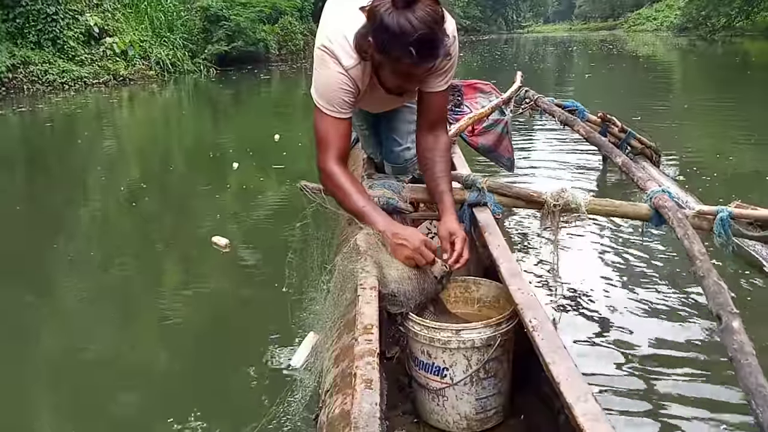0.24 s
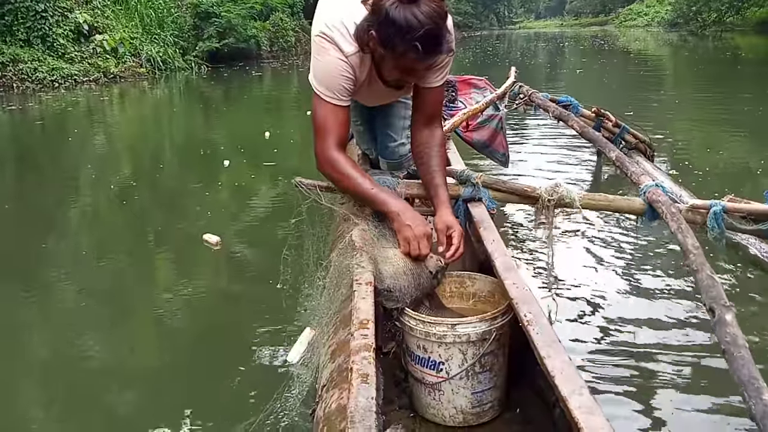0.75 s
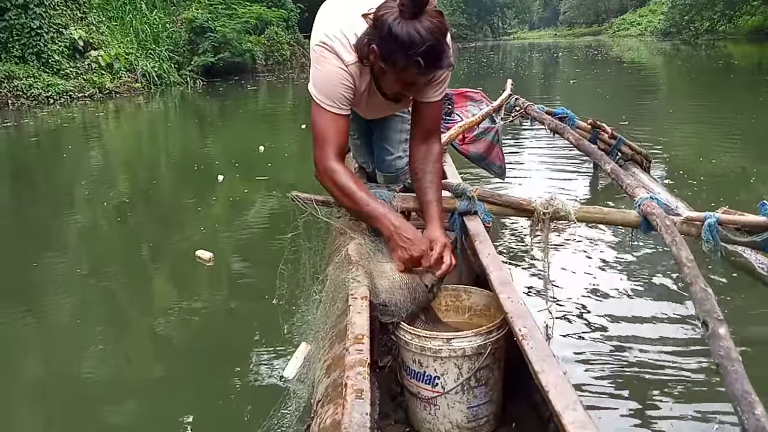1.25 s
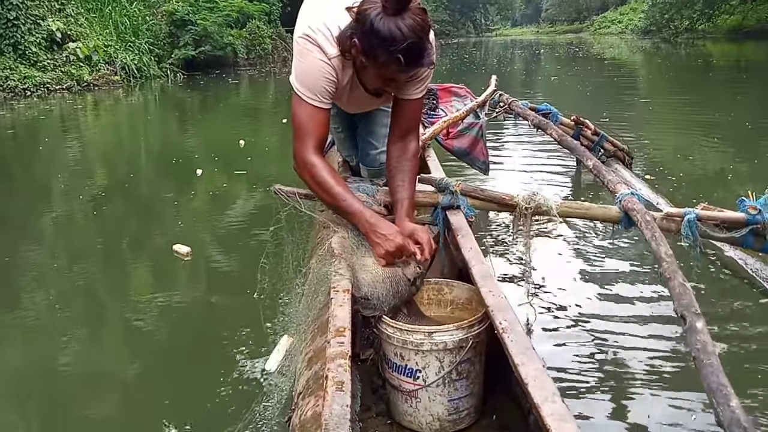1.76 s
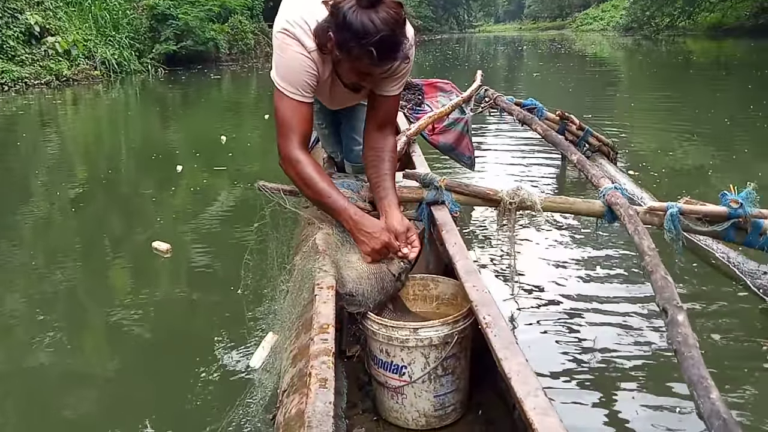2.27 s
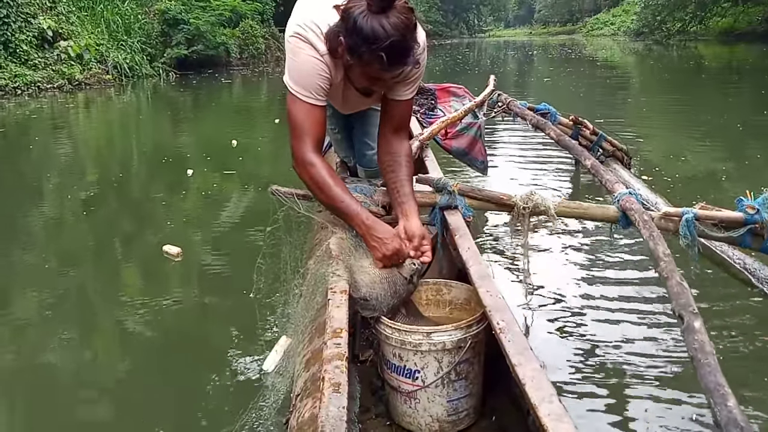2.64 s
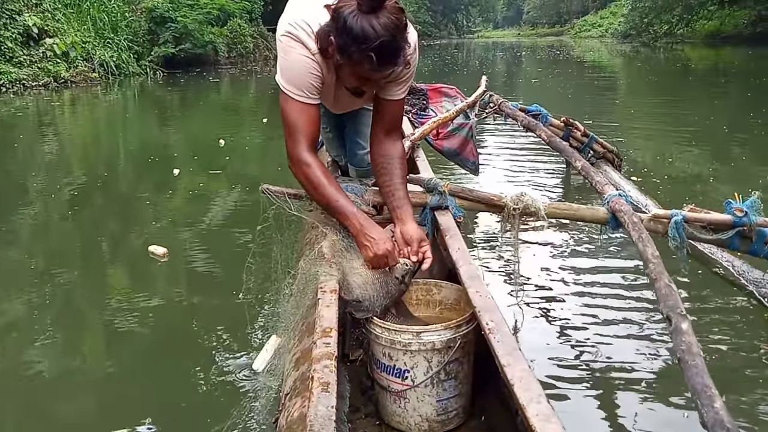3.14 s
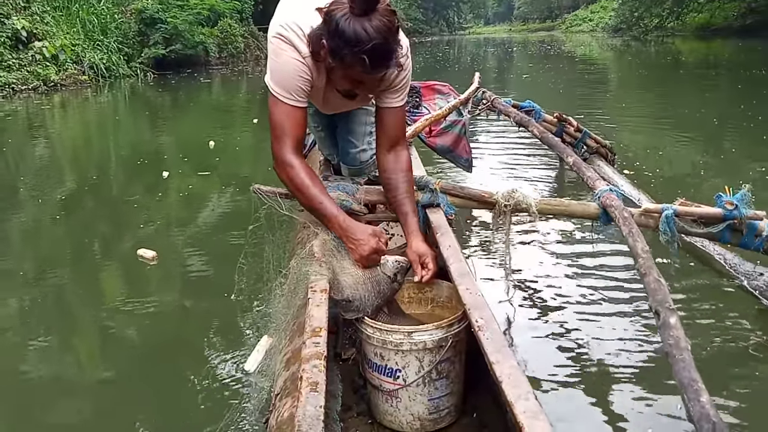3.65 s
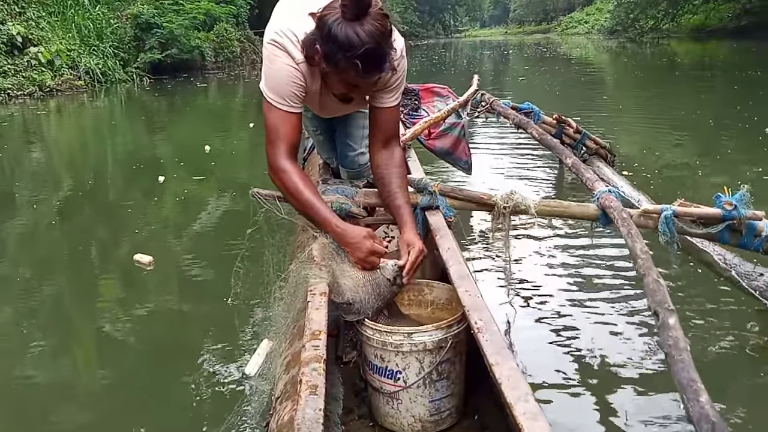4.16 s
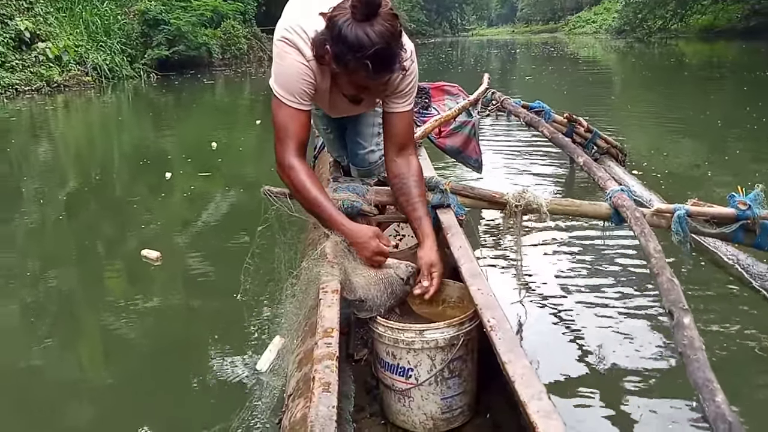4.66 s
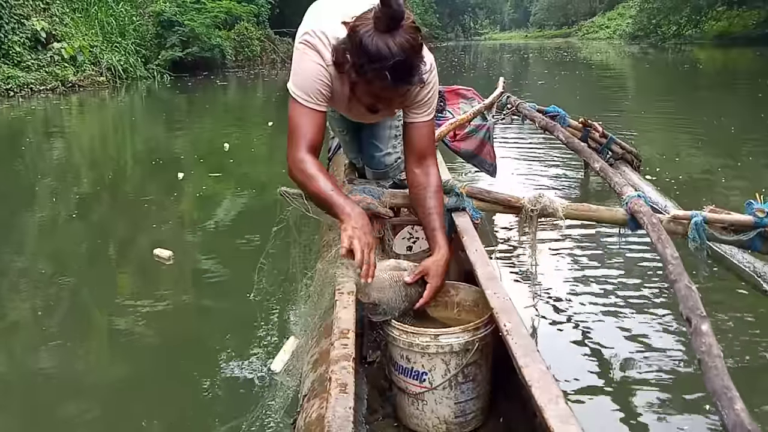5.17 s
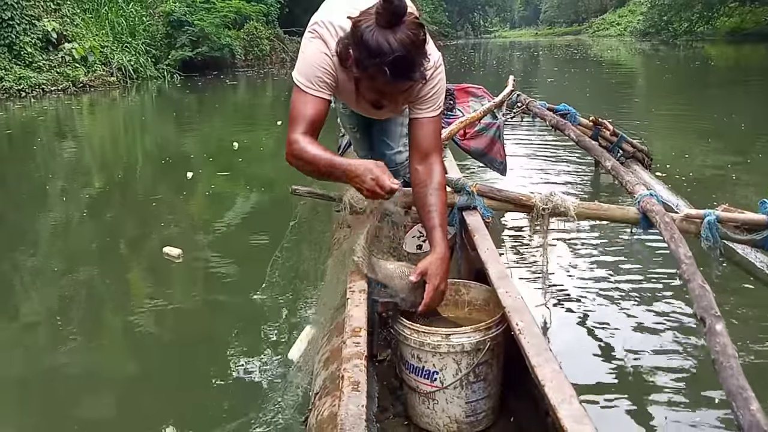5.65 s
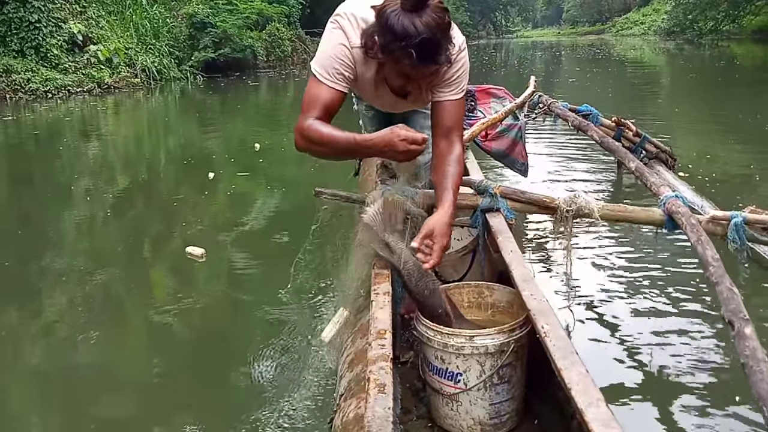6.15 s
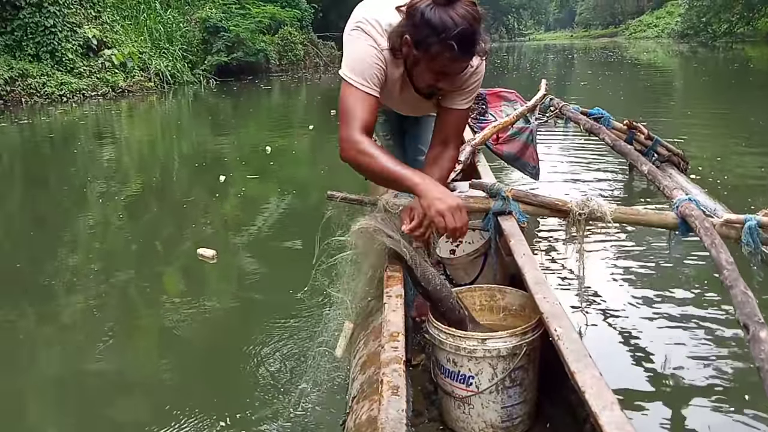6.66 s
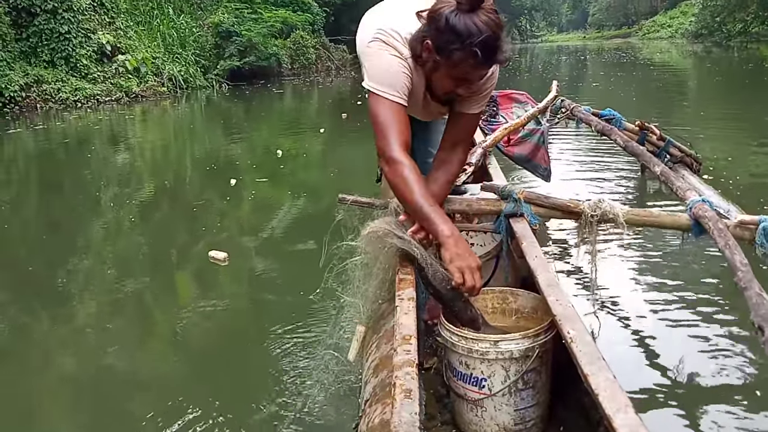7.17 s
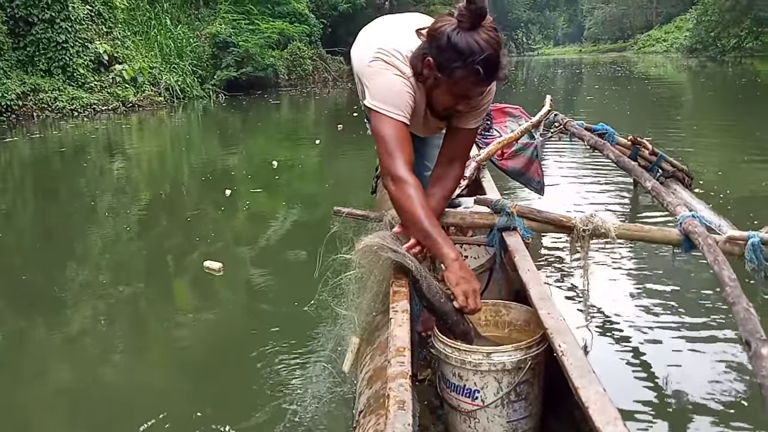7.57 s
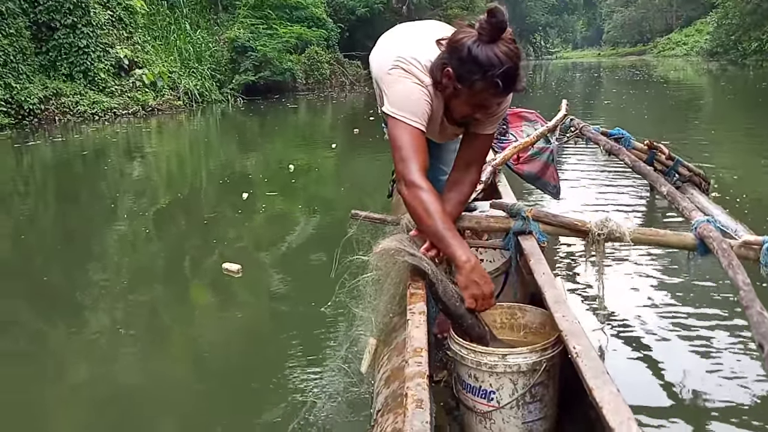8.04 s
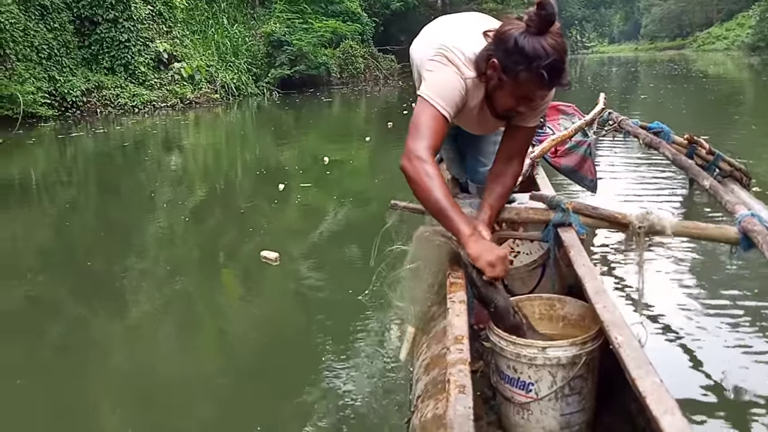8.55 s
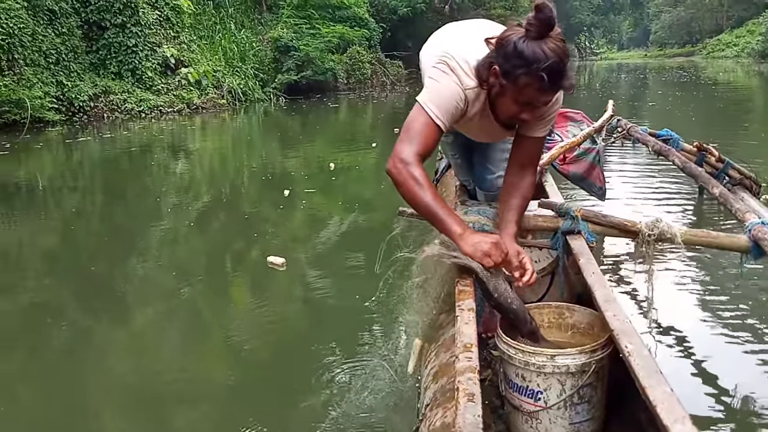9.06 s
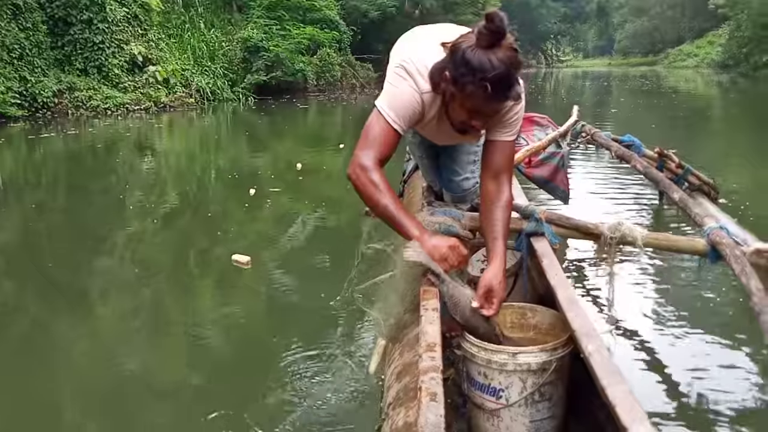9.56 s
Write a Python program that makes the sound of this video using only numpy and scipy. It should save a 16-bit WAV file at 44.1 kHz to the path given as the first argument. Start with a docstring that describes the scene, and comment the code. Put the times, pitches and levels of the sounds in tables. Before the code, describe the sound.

Outdoors on a calm wooded river, many birds call with a leafy, scattered echo: a loud fluting whistle in the first second, low husky hoots throughout, peeps, burry calls and quick see-saw trills. Close to the microphone, wet netting rustles and ticks, water laps a wooden hull, and a hard knock lands midway. A slow engine throbs faintly far off under a soft hush.

```python
"""Birds call from the wooded banks of a calm river, heard from a small wooden outrigger boat.
Throughout, filtered noise gives hush, lapping water and the rustle of a wet net, with ticks and knocks;
filtered pulses give a slow engine far away. Low hoots and chirps open the scene, gliding tones all of them;
a near bird soon flutes, then come burry calls, thin whistles, see-saw trills and slurs.
A band-by-band decaying noise echo stands for the trees, which scatter every call."""
import sys
import numpy as np
from scipy import signal
from scipy.io import wavfile
from scipy.ndimage import map_coordinates

SR = 44100
rng = np.random.default_rng(int(sys.argv[2]) if len(sys.argv) > 2 else 0)


def log_audio(samples):
    """Write samples as a 16-bit WAV file to the path given in sys.argv[1]."""
    # one column per channel
    frames = np.atleast_2d(samples).T
    # limit to full scale, then quantise
    limited = np.clip(frames, -1, 1)
    pcm = np.round(limited * 32767).astype(np.int16)
    wavfile.write(sys.argv[1], SR, pcm)


N = 432621
TIME = np.arange(N) / SR


def gain_of(db):
    """Level: an amplitude ratio is ten to the power of decibels over twenty."""
    return 10 ** (np.asarray(db) / 20)


def evened(x):
    """Normalization: scales a signal to rms 1."""
    return x / np.sqrt(np.mean(x ** 2) + 1e-20)


def read(points, hz):
    """Interpolation on a log-frequency axis, as pitch is heard."""
    f, value = np.transpose(points)
    return np.interp(np.log(hz + 1), np.log(f + 1), value)


def add(mix, s, sound):
    """Superposition: adds a sound into the mix, in place, from time s."""
    part = mix[max(round(s * SR), 0):][:len(sound)]
    part += sound[:len(part)]


def wander(count, hz):
    """Band-limited chance: a smooth curve through random knots, hz of them a second, of about unit size."""
    knots = rng.standard_normal(4096)
    return map_coordinates(knots, [np.arange(count) * hz / SR], order=2, mode="wrap")


def coloured(x, points):
    """Minimum-phase filtering: shapes the spectrum causally; white noise keeps its power."""
    log_gain = np.log(gain_of(read(points, abs(np.fft.fftfreq(4096, 1 / SR)))))
    # the Hilbert transform of the log gain gives the minimum phase
    response = np.exp(np.conj(signal.hilbert(log_gain)))
    taps = np.fft.ifft(response).real
    return signal.oaconvolve(x, taps / np.linalg.norm(taps))[:len(x)]


def patchy(x, depth_db, patch_s, patch_hz):
    """Time-frequency modulation: swells and sinks a sound in random patches of time and pitch."""
    hz, t, z = signal.stft(x, SR, nperseg=512)
    cells = np.meshgrid(hz / patch_hz, t / patch_s, indexing="ij")
    field = map_coordinates(rng.standard_normal((128, 1024)), cells, order=1, mode="wrap")
    patch_gain = gain_of(depth_db * np.clip(evened(field), -2, 2))
    return signal.istft(z * patch_gain, SR, nperseg=512)[1][:N]


def swell(s, span_s, edge_db):
    """Envelope: a gain that peaks at time s and is edge_db down span_s before and after."""
    distance = np.minimum(abs(TIME - s) / span_s, 20)
    return gain_of(-abs(edge_db) * distance ** 1.74)


def air():
    """Broadband ambience: river, leaves and far insects blend into a soft hush, drifting in patches."""
    # spectrum of the hush: (frequency [Hz], relative density [dB])
    hush_spectrum = [(20, -2.5), (45, 6), (110, 13.5), (200, 3), (300, -4.5), (420, -24.5), (640, 3),
                     (950, -14), (1600, -7.5), (2400, -5), (3200, -11), (4100, -7.5), (4550, -11),
                     (5000, -41), (7200, -33.5), (9000, -39.5), (9800, -44), (15500, -42.5)]
    hush = patchy(rng.standard_normal(N), depth_db=1.1, patch_s=.08, patch_hz=400)
    return gain_of(-51) * evened(coloured(hush, hush_spectrum))


def water():
    """Amplitude-modulated noise: small ripples gurgle along the hull; larger ones slap it."""
    # spectrum of water on the hull: (frequency [Hz], relative density [dB])
    lapping = [(80, -16), (150, 4.5), (260, 3.5), (420, -4.5), (650, 1.5), (1000, -9), (1700, -9.5),
               (3000, -18.5), (5500, -51)]
    # ripples slapping the hull: (time of the height [s], time to swell and to sink [s], level [dB])
    laps = [(1.239, 0.17, -54), (1.63, .06, -56), (2.35, 0.45, -61.5), (2.67, 0.023, -53.5),
            (2.95, 0.058, -46.5), (3.41, 0.088, -56.5), (4.38, 0.18, -59), (5.25, 0.026, -55),
            (5.58, 0.13, -50.5), (6.33, 0.63, -54), (7.15, 0.035, -72), (7.82, 0.22, -64),
            (8.54, 0.42, -54.5), (9.11, 0.039, -54.5), (9.4, 0.17, -54)]
    middle_db, sway_db, sways_per_s = -71.5, 10.5, 8  # the small ripples
    lap_edge_db = -9.5  # a slap at the ends of its span
    gurgle = patchy(rng.standard_normal(N), depth_db=3.5, patch_s=.07, patch_hz=260)
    ripples = gain_of(middle_db + sway_db * np.clip(wander(N, sways_per_s), -2, 1))
    slaps = sum(gain_of(db) * swell(s, span, lap_edge_db) for s, span, db in laps)
    return (ripples + slaps) * evened(coloured(gurgle, lapping))


def engine():
    """Pulse train: uneven firings of a slow one-cylinder engine; only the bass carries this far."""
    # the running of the engine: (time [s], firing rate [1/s], level before a 0.08 dB trim [dB])
    running = [(0.0, 25.1, -48.5), (3.33, 25.0, -49), (3.79, 23.9, -52.5), (4.12, 25.0, -49),
               (5.6, 25.0, -47), (6.12, 24.2, -47.5), (6.56, 25.7, -50), (7.87, 24.5, -47.5),
               (8.74, 24.8, -48.5), (9.1, 23.4, -44.5), (9.67, 27, -50), (9.81, 23.7, -48)]
    # spectrum of the thud from afar: (frequency [Hz], relative density [dB])
    exhaust = [(25, -52), (38, -27), (50, -4), (75, 4.5), (100, 6.5), (125, -2), (150, -8), (200, -26.5),
               (320, -39), (700, -61), (2000, -100)]
    s, rate, db = np.transpose(running)
    cycles = np.cumsum(np.interp(TIME, s, rate)) / SR + 0.02 * wander(N, 16)
    # one pulse whenever a whole cycle is completed
    firings = np.diff(np.floor(cycles), prepend=0) * gain_of(2.2 * wander(N, 22))
    return gain_of(np.interp(TIME, s, db) - 0.08) * evened(coloured(firings, exhaust))


def burst(t60):
    """Exponential decay: a scrape of noise that falls 60 dB in t60 seconds."""
    t = np.arange(SR // 4) / SR
    return rng.standard_normal(len(t)) * np.exp(-np.log(1000) * t / t60)


def snap(t60):
    """Two-stage decay: a sharp crack over a weaker shiver that dies in t60 seconds."""
    return gain_of(4) * burst(.007) + gain_of(-3) * burst(t60)


def net_ticks():
    """Impulsive release: taut line slips free with a crack, heard in three bands."""
    # slips of line: (time [s], base level [dB], body offset [dB], top-octave offset [dB])
    slips_of_line = [(1.295, -59, 9, -7), (2.0698, -48, 1, -10), (2.577, -44, -8, -19),
                     (2.6771, -49, 15, -20), (2.9144, -43.5, 9.5, 0), (2.943, -51, 16, -8),
                     (4.13, -58, 16, -19), (4.366, -51, 15, -18), (5.779, -51, 11, -23),
                     (8.3922, -50.5, 7, -28), (8.5604, -46, -11, -5), (9.2963, -39, 2, -11),
                     (9.5854, -53, 9.5, -15)]
    # spectra of the three bands: (frequency [Hz], relative density [dB])
    top_spectrum = [(6000, -40), (10500, -15), (13500, -9), (15500, -3)]
    treble_spectrum = [(3000, -31), (5000, 3.5), (7000, 9), (9500, 1), (12000, -30.5)]
    body_spectrum = [(150, 10), (450, 4.5), (900, 2), (2500, 5), (4100, -2), (4700, -7), (5300, -31.5)]
    top, treble, body = np.zeros((3, N))
    for s, db, body_db, top_db in slips_of_line:
        add(top, s, gain_of(db + top_db + 4.5) * snap(.04))
        add(treble, s, gain_of(db - 8.5) * snap(0.068))
        add(body, s, gain_of(db + body_db) * snap(0.1))
    return coloured(top, top_spectrum) + coloured(treble, treble_spectrum) + coloured(body, body_spectrum)


def net_knocks():
    """Damped impact: net and catch bump on hull and bucket as decaying bursts of dull noise."""
    # bumps: (time [s], starting level [dB], 60 dB decay time [s])
    knocks = [(2.944, -40, 0.2), (3.508, -47, 0.26), (4.64, -38.5, 0.023), (4.7405, -40.5, 0.022),
              (4.8905, -50, 0.018), (5.4376, -38.5, 0.14), (5.4743, -23, 0.057), (5.482, -27.5, 0.064),
              (5.578, -30, 0.053), (5.721, -44.5, 0.39), (5.778, -45, .15), (6.06, -45.5, 0.11),
              (6.288, -44, 0.039), (6.5697, -46, 0.029), (8.393, -38.5, .1), (8.561, -40, 0.04),
              (9.379, -42, 0.094)]
    # spectrum of a bump: (frequency [Hz], relative density [dB])
    hull = [(80, -2), (200, -4), (420, -10.5), (900, 8), (1400, 0), (1800, 6), (2500, -1), (4100, -2.5),
            (4600, -18.5), (5200, -26), (7000, -27.5), (10500, -43), (15000, -54)]
    bumps = np.zeros(N)
    for s, db, t60 in knocks:
        add(bumps, s, gain_of(db) * burst(t60))
    return coloured(bumps, hull)


def net_rustle():
    """Stick-slip friction: many tiny random slips of wet mesh merge into a clumpy rustle."""
    # pulls on the net: (time of the height [s], time to rise and to fall [s], level [dB])
    pulls = [(2.7, 0.23, -56), (3.7, 0.52, -72), (4.55, 0.2, -60.5), (5.45, 0.37, -54), (5.76, 0.08, -57),
             (6.33, 0.16, -65), (6.57, 0.041, -60.5), (6.89, 0.063, -56.5), (8.24, 0.069, -50.5),
             (8.68, 0.11, -49.5), (9.02, 0.036, -51), (9.46, 0.14, -47)]
    # lulls of the hands: (time of the stillest [s], time to slow down and to start again [s])
    pauses = [(2.1, 0.41), (3.25, 0.14), (5.05, 0.18), (7.3, 0.58)]
    # spectrum of the mesh: (frequency [Hz], relative density [dB])
    mesh = [(100, -10), (250, 5.5), (430, -3.5), (1000, 8.5), (1800, 0), (4200, -2.5), (4700, -11),
            (5200, -26), (7500, -26.5), (10500, -39), (15000, -39.5)]
    pull_edge_db = -16.5  # a pull at the ends of its span
    fingers_db = -59.5  # the fingers' work between pulls
    slip_sizes = gain_of(3.5 * np.minimum(rng.exponential(1, N), 4))
    slips = rng.standard_normal(N) * (rng.random(N) < 3000 / SR) * slip_sizes  # about 3000 a second
    clumps = patchy(slips, depth_db=4, patch_s=.022, patch_hz=700)
    pulling = sum(gain_of(db) * swell(s, span, pull_edge_db) for s, span, db in pulls)
    lulls = sum(swell(s, span, pull_edge_db / 2) for s, span in pauses)
    busy = np.clip(1.5 - lulls, 0, 1)
    return coloured(evened(clumps) * (gain_of(fingers_db) * busy + pulling), mesh)


def forest(x, build_s):
    """Multiple scattering: trunks and leaves make an echo that builds up, then dies band by band."""
    # echo of the wooded banks: (frequency [Hz], 60 dB decay time [s])
    decay_times = [(300, 0.9), (700, 0.33), (1700, 0.85), (2800, 1.01), (4000, 0.69), (8000, 0.82)]
    count = 3 * SR // 2
    taps = rng.standard_normal(count) * (rng.random(count) < .08)  # sparse reflections
    hz, t, z = signal.stft(taps, SR, nperseg=256)
    decay = np.exp(-np.log(1000) * t / read(decay_times, hz)[:, None])
    build_up = 1 - np.exp(-t / build_s)
    tail = signal.istft(z * decay * build_up, SR, nperseg=256)[1]
    return signal.fftconvolve(x, tail / np.linalg.norm(tail))[:N]


def sing(notes, overtones, waver, flutter_db):
    """Frequency modulation: unsteady tones on pitch curves; faint overtones swell less than the note."""
    out = np.zeros(N)
    for rows in notes:
        s, pitch, level = np.transpose(rows)
        t = np.arange(s[0], max(s[-1], s[0] + .005), 1 / SR)
        hz = np.interp(t, s, pitch) * (1 + waver * wander(len(t), 158.3))
        phase = 2 * np.pi * np.cumsum(hz) / SR
        size = gain_of(np.interp(t, s, level) + flutter_db * wander(len(t), 71.96))
        upper = sum(gain_of(db) * np.sin(k * phase) for k, db in overtones)
        tone = size * np.sin(phase) + np.sqrt(size * size.mean()) * upper
        edges = np.clip(np.minimum(t - t[0], t[-1] - t) / .003, 0, 1)  # 3 ms fades
        add(out, s[0], np.sqrt(2) * tone * edges)  # levels are rms, hence the root of 2
    return out


def arched(rows):
    """Glide and envelope: chirps glide fast at first, swell, and level off as they fade."""
    notes = []
    for s, length, start, end, db in rows:
        middle = start + 0.78 * (end - start)
        notes.append([(s, start, db - 2.0), (s + length / 2, middle, db), (s + length, end, db - 7)])
    return notes


def hoot(s, rise_s, fall_s, top_hz, hold, db):
    """Pitch contour: a note scoops up to its top and sinks back, loudest at the top."""
    base_hz, start_db, end_db = 595.7, -9, -7  # both ends share one pitch; levels against the top
    u = np.arange(1, 10 + 1) / 10
    times = s + np.r_[0, rise_s * u, rise_s + fall_s * u]
    height = np.r_[0, u ** 1.2, 1 - u ** hold]
    level = db + np.r_[start_db, start_db * (1 - u ** 2), end_db * u ** 1.4]
    return np.c_[times, base_hz + (top_hz - base_hz) * height, level]


def hooting_bird():
    """Scattering and delay: low husky hoots, broken up by the trees and doubled by the far bank."""
    # hoots before the mix: (time [s], rise [s], fall [s], top pitch [Hz],
    # hold of the top as a power [1], under 1 sags early, peak level [dB])
    hoots = [(0, 0.17, 0.28, 679, 1.2, -55.5), (1.05, 0.17, 0.42, 720, 1.4, -52),
             (2.08, 0.091, 0.043, 801, 5.4, -42.5), (2.33, 0.24, 0.34, 832.6, 1.77, -43),
             (3.25, 0.06, 0.025, 778, 3.8, -49), (3.45, 0.27, 0.35, 781, 0.84, -43),
             (4.45, .1, 0.4, 792.3, 1.77, -41.5), (5.5, .12, .46, 754, .6, -51.5),
             (6.75, .24, 0.26, 745, 1.12, -50.5), (7.9, .2, .3, 724, 0.39, -50.5),
             (8.93, 0.33, 0.28, 777.5, 0.45, -49.5)]
    husk_hz, husk_follows = 670, 0.64  # the husky part stays near one pitch, following only partly
    far_bank_s = 0.1  # delay of the far bank
    notes = [hoot(*row) for row in hoots]
    voice = sing(notes, [(2, -32.0), (3, -29.5)], waver=0.013, flutter_db=1)
    husky = [[(s, husk_hz + husk_follows * (hz - husk_hz), db) for s, hz, db in note] for note in notes]
    scattered = sing(husky, [(2, -24)], waver=.08, flutter_db=2)
    add(scattered, far_bank_s, gain_of(-9) * voice)
    heard = gain_of(-3.5) * voice + gain_of(-2.5) * forest(scattered, build_s=0.011)
    return patchy(heard, depth_db=2, patch_s=.04, patch_hz=90)


def tree_birds():
    """Direct and diffuse sound: chirps and peeps from deep in the foliage carry a strong echo."""
    # chirps before the mix: (time [s], length [s], start pitch [Hz], end pitch [Hz], level [dB])
    chirps = [(0, 0.051, 2210, 1886, -52), (.125, .073, 3720, 4600, -62.5), (2.295, 0.036, 2550, 3018, -52),
              (3.85, 0.104, 1950, 2210, -61), (4.73, 0.044, 1570, 1720, -57),
              (4.88, 0.035, 3140, 2720, -59), (5.132, 0.027, 2820, 3030, -44.5),
              (7.63, 0.025, 3400, 2770, -56), (7.655, 0.03, 1655, 1760, -54),
              (7.876, 0.019, 2780, 3020, -44.5), (8.433, .034, 2640, 3080, -49.5),
              (9.18, 0.017, 3300, 2960, -52)]
    # one bird's repeated upward peep, before the mix: (time [s], top pitch [Hz], level [dB])
    peep_rows = [(1.15, 2450, -49.5), (1.54, 2423, -55.5), (1.81, 2440, -57), (3.61, 2317, -54.5),
                 (3.9, 2274, -56), (4.16, 2390, -58), (4.24, 2330, -57.5), (4.52, 2210, -57),
                 (4.95, 2310, -58.5), (5.375, 2340, -53.5), (6.225, 2310, -59.5), (6.725, 2285, -60.5),
                 (7.37, 2313, -58), (7.7, 2360, -57), (8.07, 2290, -57.5), (9.11, 2253, -53.5),
                 (9.775, 2310, -55)]
    peep_s, peep_rise_hz = .048, 128
    peeps = [(s, peep_s, hz - peep_rise_hz, hz, db) for s, hz, db in peep_rows]
    voice = sing(arched(chirps + peeps), [(2, -60)], waver=0.015, flutter_db=1.5)
    echo = patchy(forest(voice, build_s=.008), depth_db=4, patch_s=.01, patch_hz=200)
    return gain_of(5.0) * voice + gain_of(2.5) * echo


def near_bird():
    """Absorption and scattering: the air dulls the top of loud fluting whistles, and leaves roughen their echo."""
    # one list a note, before the mix: (time [s], pitch [Hz], level [dB])
    whistles = [
        [(.115, 1750, -60), (.172, 2200, -41.5), (.224, 2400, -41.5), (.235, 2410, -26.5), (.242, 2704, -32),
         (.30, 2785, -32), (.385, 2848, -35.5), (.42, 2837, -35), (.46, 2780, -33), (.51, 2590, -40),
         (.55, 1850, -61)],
        [(.475, 1486, -54.5), (.555, 1386, -37.5), (.59, 1333, -38.5)],
        [(.70, 2100, -50), (.76, 2350, -46.5), (.77, 2380, -30.5), (.785, 2694, -49.5), (.83, 2566, -38.5),
         (.865, 1980, -40.5)],
        [(.75, 940, -66), (.83, 881, -40.5), (.855, 847, -57.5)],
        [(.872, 1806, -38.5), (.902, 1765, -26.5), (.932, 1701, -32), (.963, 1685, -20.5), (.984, 1587, -29.5)],
        [(.982, 1334, -40.5), (1.014, 1190, -30.5), (1.03, 1090, -40), (1.06, 927, -39.5), (1.085, 910, -50)],
        [(2.912, 1803, -36.5), (2.935, 1573, -38), (2.95, 1404, -27.5), (2.965, 1210, -37), (2.985, 1005, -42),
         (3.01, 988, -48), (3.04, 960, -44), (3.085, 920, -48)],
        [(2.99, 2405, -41), (3.012, 2350, -46.5), (3.022, 1936, -30), (3.038, 1927, -26.5),
         (3.055, 1864, -31.5), (3.075, 1873, -34)],
    ]
    # overtones against the note: (multiple [1], level [dB])
    flute_overtones = [(2, -26.5), (3, -40), (4, -48), (5, -43.5), (6, -54.5)]
    voice = sing(whistles, flute_overtones, waver=0.0039, flutter_db=0.5)
    voice = signal.sosfilt(signal.butter(4, 9000, fs=SR, output="sos"), voice)
    echo = patchy(forest(voice, build_s=.02), depth_db=2.5, patch_s=.012, patch_hz=200)
    direct = signal.sosfilt(signal.butter(1, 6000, fs=SR, output="sos"), voice)
    return gain_of(-1.0) * direct + gain_of(-9.0) * echo


def burry_bird():
    """Sideband spreading: a shaking pitch spreads each call, and its echo, over a broad band."""
    # calls before the mix: (time [s], length [s], start pitch [Hz], end pitch [Hz], level [dB])
    burrs = [(1.09, 0.094, 2637, 2944, -45), (3.062, 0.083, 2650, 2953, -39.5),
             (3.125, 0.12, 2960, 2674, -45), (3.69, 0.034, 2610, 2750, -49.5),
             (9.195, 0.0724, 2614, 3028, -38), (9.265, 0.082, 2920, 2603, -43)]
    voice = sing(arched(burrs), [(2, -42)], waver=.05, flutter_db=2.5)
    return gain_of(-5.5) * voice + gain_of(-2.5) * forest(voice, build_s=0.0064)


def high_birds():
    """Diffuse field: thin buzzy whistles slide down, blurred by distance so that the echo is stronger."""
    # whistles before the mix: (time [s], length [s], start pitch [Hz], level [dB])
    lisps = [(1.147, 0.054, 4890, -51.5), (1.534, 0.078, 4820, -56), (1.81, 0.054, 4880, -60),
             (2.111, 0.036, 4830, -56), (1.78, .1, 7950, -78), (2.318, 0.18, 5710, -67),
             (3.28, 0.21, 7270, -69), (4.85, 0.23, 5780, -71), (7.678, 0.15, 7700, -80),
             (9.216, 0.33, 7500, -72)]
    fall_octaves_per_s = 0.76
    slides = [(s, length, hz, hz * 2 ** (-fall_octaves_per_s * length), db) for s, length, hz, db in lisps]
    voice = sing(arched(slides), [(2, -46)], waver=0.013, flutter_db=3)
    return gain_of(-11) * voice + gain_of(-6.5) * forest(voice, build_s=0.0066)


def trill(s, pairs, step_s, growth, hz, db):
    """Rhythmic alternation: paired strokes climb and grow louder as their steps stretch or shrink."""
    # upstroke and downstroke: (delay [s], length [s], start share of the pitch [1],
    # end share of the pitch [1], relative level [dB])
    strokes = [(0, 0.0282, .95, 1.03, 0), (.032, .024, 1.185, 1.1, -2)]
    swell_db, climb_hz = 6.5, 71.5  # a trill starts this much softer and lower
    stray_hz = 25  # random spread of pitch from pair to pair
    rows = []
    for k in range(pairs):
        left = 1 - k / (pairs - 1)
        level = db - swell_db * left ** 2
        pitch = hz - climb_hz * left ** 2 + stray_hz * rng.standard_normal()
        for delay, length, start, end, stroke_db in strokes:
            rows.append((s + delay, length, pitch * start, pitch * end, level + stroke_db))
        s = s + step_s * growth ** k
    return rows


def trilling_bird():
    """Overlapping reverberation: the echoes of quick see-saw trills run together into two bands."""
    # trills before the mix: (time [s], pairs of notes [1], first step [s], growth of the step [1],
    # final mean pitch [Hz], final level [dB])
    trills = [(1.517, 5, 0.062, 1.045, 3483, -46), (2.514, 4, .067, 1.2, 3307, -41),
              (7.07, 4, .07, 0.72, 3530, -66.5), (8.633, 4, 0.064, 1.19, 3402, -40)]
    strokes = [stroke for row in trills for stroke in trill(*row)]
    voice = sing(arched(strokes), [(2, -55)], waver=0.016, flutter_db=1.5)
    echo = patchy(forest(voice, build_s=.014), depth_db=4, patch_s=.01, patch_hz=200)
    return gain_of(1.5) * voice + gain_of(1.4) * echo


def bank_birds():
    """Portamento: slurred whistles from the nearer bank follow one shared pitch contour."""
    # slurs before the mix: (time [s], length [s], reference pitch [Hz], reference level [dB])
    slurs = [(2.059, .24, 2258, -43.5), (8.213, .21, 2297, -43.5)]
    # their shape: (share of the length [1], share of the pitch [1], relative level [dB])
    slur_shape = [(0, .93, -15), (.23, 0.99, -2.5), (.5, .92, -5.5), (1, .858, -11.5)]
    notes = []
    for s, length, hz, db in slurs:
        notes.append([(s + length * when, hz * share, db + shape_db) for when, share, shape_db in slur_shape])
    voice = sing(notes, [(2, -57)], waver=0.013, flutter_db=1.0)
    return gain_of(2) * voice + gain_of(-1.0) * forest(voice, build_s=0.0092)


def scene():
    """Superposition: engine and air behind, the net and water close by, birds all round."""
    boat = air() + water() + engine() + net_ticks() + net_knocks() + net_rustle()
    birds = hooting_bird() + tree_birds() + near_bird() + burry_bird()
    birds = birds + high_birds() + trilling_bird() + bank_birds()
    return (boat + birds)[None]


def record(dry):
    """Band limitation: the microphone's low cut, then a steep upper limit."""
    low_cut = signal.butter(4, 42, "highpass", fs=SR, output="sos")
    lean = signal.sosfilt(low_cut, dry)
    band_limit = signal.firwin(511, 15600, window=("kaiser", 9), fs=SR)
    return signal.oaconvolve(lean, band_limit[None], "same")


dry = scene()
out = record(dry)
log_audio(out)
```